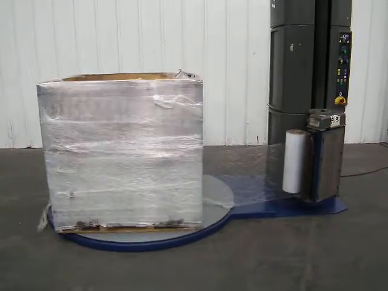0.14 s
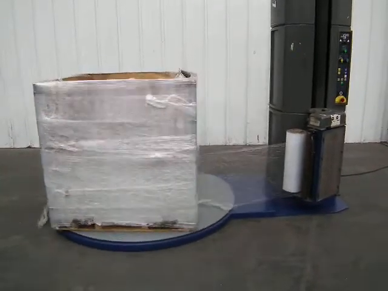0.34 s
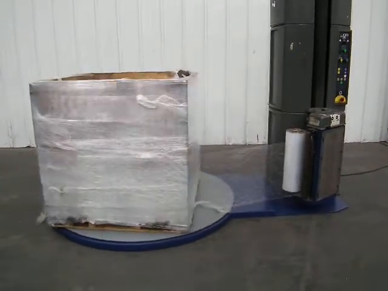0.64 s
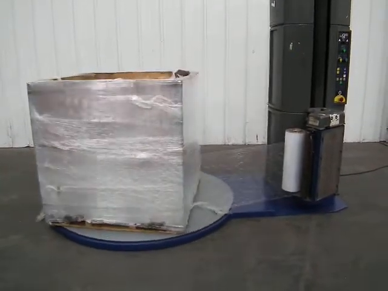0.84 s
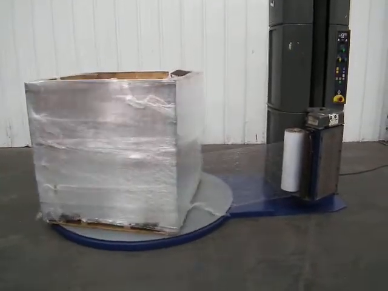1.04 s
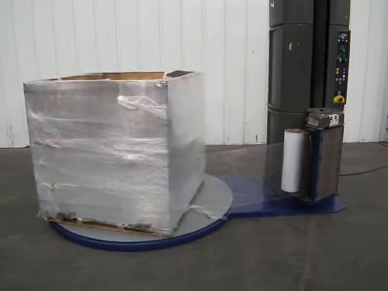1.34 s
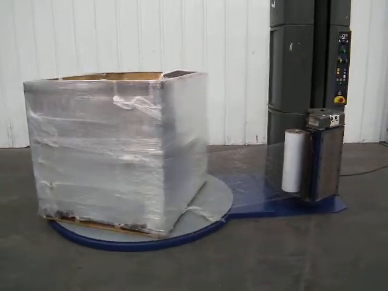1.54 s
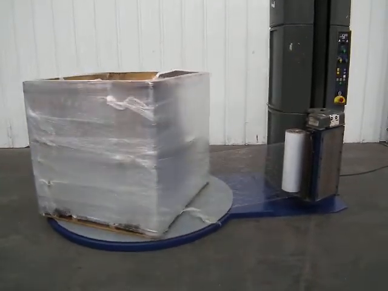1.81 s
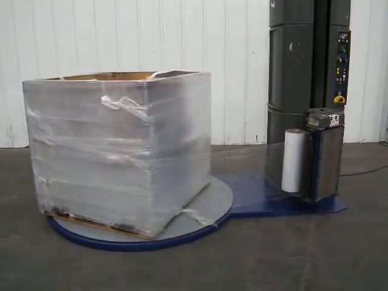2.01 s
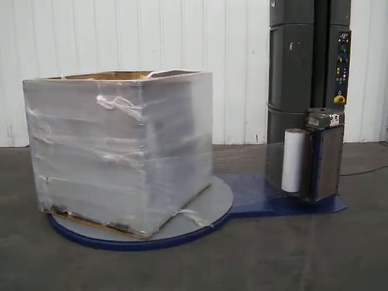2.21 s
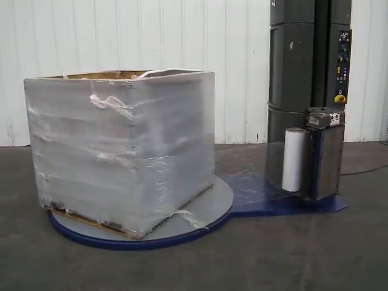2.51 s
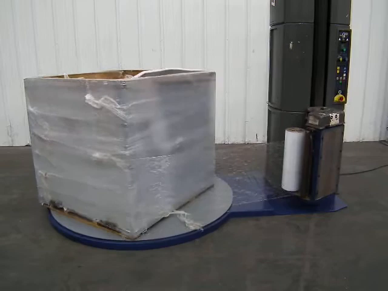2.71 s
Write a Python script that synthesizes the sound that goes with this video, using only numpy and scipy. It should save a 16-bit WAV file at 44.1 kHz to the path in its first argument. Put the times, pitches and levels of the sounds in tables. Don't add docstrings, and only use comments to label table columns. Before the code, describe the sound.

A pallet wrapping turntable hums and rumbles throughout, its motor wavering in load, with faint gearbox whine. Film crackles and hisses at 0-0.5 s, fades, swells around 1.2 s, drops near 1.6 s, swells around 2.1 s, dips, then rises to the end. Small snaps cluster at 0.3-0.5 s, stronger pops near 1.1, 1.6 and 2.0 s; a pop and brief steel clink come at 2.8 s. Short hard-walled room reflections.

```python
import sys
import numpy as np
from scipy import signal
from scipy.fft import rfft, irfft, next_fast_len
from scipy.io import wavfile
from scipy.ndimage import map_coordinates

SR = 44100
rng = np.random.default_rng(int(sys.argv[2]) if len(sys.argv) > 2 else 0)


def materialize(psi):
    bounded = np.clip(np.atleast_2d(psi).T, -1, 1)
    quanta = np.round(bounded * 32767).astype(np.int16)
    wavfile.write(sys.argv[1], SR, quanta)


def magnitude_from_level(level_db):
    exponent = np.asarray(level_db, float) / 20
    return 10 ** exponent


N = 126126


def unit(x):
    return x / np.sqrt(np.mean(x ** 2) + 1e-20)


def along(points, hz):
    f, v = np.transpose(points)
    return np.interp(np.log(hz + 1), np.log(f + 1), v)


def curve(rows):
    return np.interp(np.arange(N) / SR, *np.transpose(rows))


def wobble(knots_per_s):
    knots = rng.standard_normal(int(N * knots_per_s / SR) + 4)
    return map_coordinates(knots, [np.arange(N) * knots_per_s / SR])


def filtered(x, response):
    m = next_fast_len(x.shape[-1] + 8192)
    spectrum = rfft(x, m) * response(np.fft.rfftfreq(m, 1 / SR))
    return irfft(spectrum, m)[..., :x.shape[-1]]


def rings(peaks, f):
    total = 0
    for k, (hz, width_hz, db) in enumerate(peaks):
        damping = 1j * f * width_hz
        total = total + (-1) ** k * magnitude_from_level(db) * damping / (hz * hz - f * f + damping)
    return total


# frequency in Hz, share of power in common (0 to 1).
PORT_LIKENESS = [(60, .99), (290, .94), (640, .87), (1400, .3), (3000, .36), (8000, .44), (15000, .65)]
# frequency in Hz, phase by which the left port leads in radians.
LEFT_LEAD = [(60, 0), (400, -.15), (950, -.5), (2240, -2.0), (3500, -1.4), (7000, -2.1), (10700, -4.2),
             (15000, -3.9)]


def ports(noises):
    def mix(hz):
        shared = along(PORT_LIKENESS, hz)
        direct, diffuse = np.sqrt(shared), np.sqrt(1 - shared)
        return np.array([direct * np.exp(1j * along(LEFT_LEAD, hz)), direct, diffuse, diffuse])
    four = filtered(noises[[0, 0, 1, 2]], mix)
    return four[:2] + four[2:]


# time in seconds, hum level in dB.
MOTOR_LOAD = [(0.0, -26.5), (0.48, -24.5), (0.53, -21), (0.61, -30.5), (0.71, -35.5), (0.98, -22.5),
              (1.39, -26.5), (1.46, -43), (1.54, -25), (1.68, -40), (1.74, -25.5), (2.13, -22),
              (2.38, -37.5), (2.86, -28)]
# frequency in Hz, level in dB, how far it follows the load (0 to 1).
HUM_LINES = [(58.5, -12, .4), (120, 0, 1.0), (240.2, -1.5, .4), (360.6, -9, .15), (480.5, -14, .1)]


def motor_hum():
    belt_hz, belt_db, crest_s = 5.3, 2, 0.059
    t = np.arange(N) / SR
    load_db = curve(MOTOR_LOAD) + belt_db * np.cos(2 * np.pi * belt_hz * (t - crest_s))
    mean_db = load_db.mean()
    hum = np.zeros(N)
    for hz, db, follows in HUM_LINES:
        sway_db = 1.54 * (1.7 - follows) * wobble(6.16)
        level_db = mean_db + db + follows * (load_db - mean_db) + sway_db
        phase = 2 * np.pi * hz * t + 0.14 * wobble(3.75)
        hum += np.sqrt(2) * magnitude_from_level(level_db) * np.sin(phase)
    return hum


# frequency in Hz, density in dB per Hz.
RUMBLE_SPECTRUM = [(40, -25), (52, -16), (170, -4.5), (450, -7.5), (1230, -17.5), (2260, -19.5),
                   (9000, -34), (15500, -57)]
# frequency in Hz, width in Hz, level in dB.
ROOM_PEAKS = [(176, 35, -10), (357, 29, -5)]


def table_rumble():
    level_db, sway_db = -20, 0.35
    noise = rng.standard_normal((3, N))
    rumble = filtered(noise, lambda f: magnitude_from_level(along(RUMBLE_SPECTRUM, f)) * (1 + abs(rings(ROOM_PEAKS, f))))
    return ports(magnitude_from_level(level_db + sway_db * wobble(4)) * unit(rumble))


# frequency in Hz, width in Hz, level in dB.
GEAR_PEAKS = [(2200, 75, 0), (2780, 110, -8), (840, 50, -4)]


def gear_whine():
    level_db, sway_db = -34.5, 1.5
    whine = unit(filtered(rng.standard_normal((3, N)), lambda f: rings(GEAR_PEAKS, f)))
    return ports(magnitude_from_level(level_db + sway_db * wobble(18)) * whine)


# time in seconds, strength in dB.
PEEL_STRENGTH = [(0, -41.5), (.4, -39.5), (.48, -42), (.53, -50), (.72, -57.5), (.86, -48.5), (1.05, -41.5),
                 (1.22, -38.5), (1.3, -42), (1.37, -49.5), (1.6, -59), (1.74, -45), (2.08, -41),
                 (2.17, -43), (2.23, -54.5), (2.4, -57), (2.6, -48), (2.86, -39)]
# frequency in Hz, density in dB per Hz.
FILM_SPECTRUM = [(700, -30), (1500, -2.5), (3000, 4.5), (5000, -1), (6600, 4), (10300, -2), (12500, -12),
                 (15500, -10)]
# frequency in Hz, width in Hz, level in dB.
SHEET_PEAKS = [(5175, 40, -2), (6400, 110, -1), (7100, 60, -3), (10500, 500, -5)]


def film_peel():
    level_db, cracks_per_s, spread_db, crack_share = 12.5, 750, 6, 0.48
    struck = rng.random(N) < cracks_per_s / SR
    cracks = struck * rng.standard_normal(N) * magnitude_from_level(spread_db * rng.uniform(-1, 1, size=N))
    hiss = rng.standard_normal((3, N))
    hiss[0] = np.sqrt(crack_share) * unit(cracks) + np.sqrt(1 - crack_share) * hiss[0]
    sheet = filtered(hiss, lambda f: magnitude_from_level(along(FILM_SPECTRUM, f)) * (1 + abs(rings(SHEET_PEAKS, f))))
    clumping_db = 0.92 * wobble(8.3) + 1.54 * wobble(44.55)
    return ports(magnitude_from_level(curve(PEEL_STRENGTH) + level_db + clumping_db) * unit(sheet))


# time in seconds, level in dB, first and second resonance in Hz, bright crack in dB.
FILM_SNAPS = [(.358, -18, 3000, 6400, 0), (.301, -19.5, 3280, 2200, -6), (0.378, -16, 2400, 3580, 0),
              (0.421, -20, 2560, 3950, -4), (.479, -19, 4930, 6400, -4), (.829, -25, 8500, 13000, 6),
              (0.988, -15.5, 3530, 3700, 2), (1.098, -10.5, 1900, 6300, -10), (1.101, -7.5, 2750, 3260, -9),
              (1.113, -10, 2260, 2660, -12), (1.204, -16.5, 2750, 6540, -11), (1.248, -24, 6500, 5000, 5),
              (1.301, -19.5, 6000, 13000, 11), (1.597, -15.5, 3320, 1700, -9.5),
              (1.601, -9, 2080, 2700, -21), (1.659, -24.5, 8500, 13000, 7), (1.871, -13.5, 3550, 2800, 5),
              (1.997, -11.5, 2630, 4830, 2), (2.058, -14, 3100, 5000, 3), (2.3, -35, 6000, 13000, 0),
              (2.681, -21, 4000, 13000, 6), (2.810, -9, 2400, 4660, 1)]


def film_snaps():
    rise_s, relative_width = 0.0016, 0.13
    out, t = np.zeros(N + SR), np.arange(SR // 8) / SR
    shape = (t / rise_s / 2) ** 2 * np.exp(2 - t / rise_s)
    for start_s, db, first_hz, second_hz, bright_db in FILM_SNAPS:
        body, crack = rng.standard_normal((2, len(t)))
        width_hz = relative_width * first_hz
        peaks = [(first_hz, width_hz, 0), (second_hz, width_hz, -2)]
        body = unit(filtered(body, lambda f: rings(peaks, f)))
        crack = magnitude_from_level(bright_db) * unit(filtered(crack, lambda f: magnitude_from_level(along(FILM_SPECTRUM, f))))
        burst = unit((body + crack) * shape) * np.sqrt(rise_s)
        out[round((start_s - 0.002) * SR):][:len(t)] += magnitude_from_level(db + 10) * burst
    return out[:N]


# frequency in Hz, decay t60 in seconds.
HALL_DECAY = [(500, .3), (3000, .2), (12000, .12)]


def hall(x):
    hz, t, z = signal.stft(rng.standard_normal((2, SR // 2)), SR, nperseg=256)
    decay = magnitude_from_level(-60 * t / along(HALL_DECAY, hz)[:, None])
    tail = signal.istft(z * decay, SR, nperseg=256)[1]
    delayed = np.pad(x, (200, 0))[None]
    return signal.fftconvolve(delayed, tail / np.linalg.norm(tail[0]), axes=1)[:, :N]


# frequency in Hz, level in dB, decay t60 in seconds.
STEEL_MODES = [(4624, -1.5, 0.13), (6008, -4, .12), (6200, 0, .025), (6300, 1, 0.14), (7250, -5, .06),
               (8400, 15, .04), (9500, -12, 0.035)]


def steel_clink():
    start_s, level_db, rise_s = 2.811, -17, 0.00083
    out, t = np.zeros(N + SR), np.arange(SR // 8) / SR
    ring = np.zeros(len(t))
    for hz, db, t60_s in STEEL_MODES:
        drift = 0.015 * np.cumsum(rng.standard_normal(len(t)))
        ring += magnitude_from_level(db - 60 * t / t60_s) * np.sin(2 * np.pi * hz * t + drift)
    out[round(start_s * SR):][:len(t)] += magnitude_from_level(level_db) * (1 - np.exp(-t / rise_s)) * ring
    return out[:N]


def scene():
    machine = motor_hum() + table_rumble() + gear_whine()
    film = film_peel()
    pops = film_snaps() + steel_clink()
    left_only = np.array([[1], [0]])
    direct = filtered(np.array([pops, pops]), lambda f: np.exp(1j * along(LEFT_LEAD, f) * left_only))
    return machine + film + direct + magnitude_from_level(-10) * hall(pops)


def low_pass(x):
    return signal.sosfilt(signal.butter(12, 15660, fs=SR, output="sos"), x)


# frequency in Hz, left minus right in dB.
PORT_LEAN = [(60, -1), (130, -2), (290, -2), (640, -4), (1410, -4), (3100, -4.0), (6820, -2), (15000, -9)]
# frequency in Hz, width in Hz, depth in dB.
DEAF_BANDS = [(7900, 330, -24), (8830, 420, -30), (8450, 1900, -17), (11700, 420, -38), (15800, 1150, -60)]


def record(dry):
    def response(f):
        deaf_db = 0
        for hz, width_hz, db in DEAF_BANDS:
            off = (f - hz) / width_hz
            deaf_db = deaf_db + db * np.exp(-(2 * off) ** 2 * (1 + off ** 2))
        return magnitude_from_level(deaf_db + along(PORT_LEAN, f) * np.array([[0.5], [-0.5]]))
    heard = filtered(dry, response)
    ceiling = 0.9
    heard = heard / (1 + abs(heard / ceiling) ** 6) ** (1 / 6)
    return low_pass(heard)


dry = scene()
out = record(dry)
materialize(out)
```